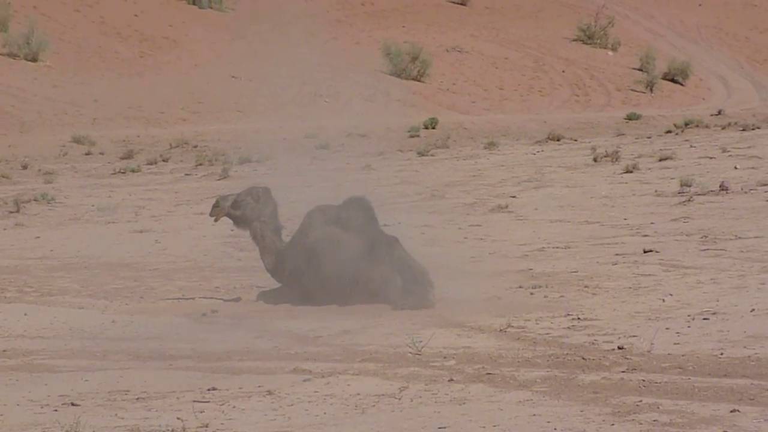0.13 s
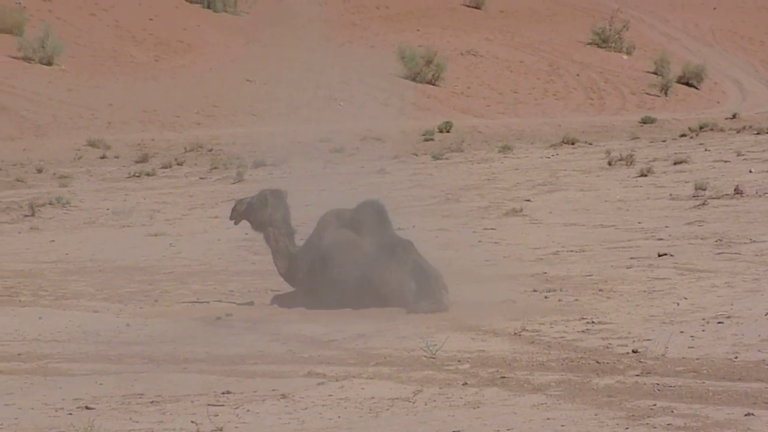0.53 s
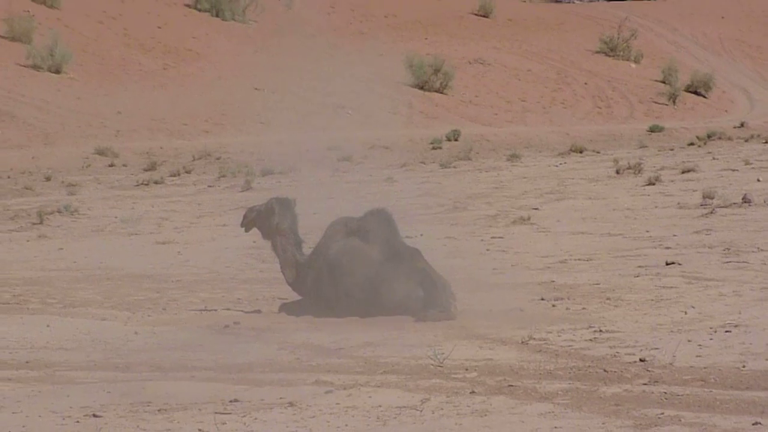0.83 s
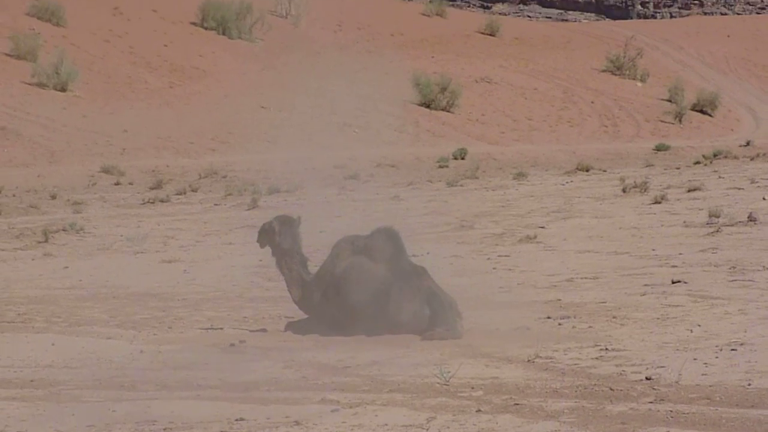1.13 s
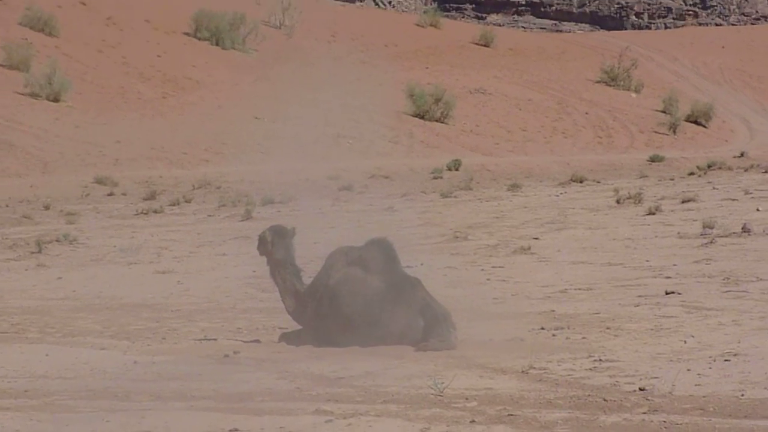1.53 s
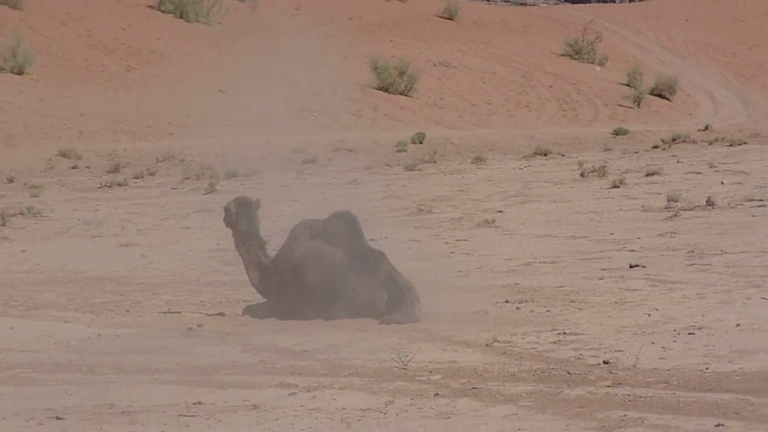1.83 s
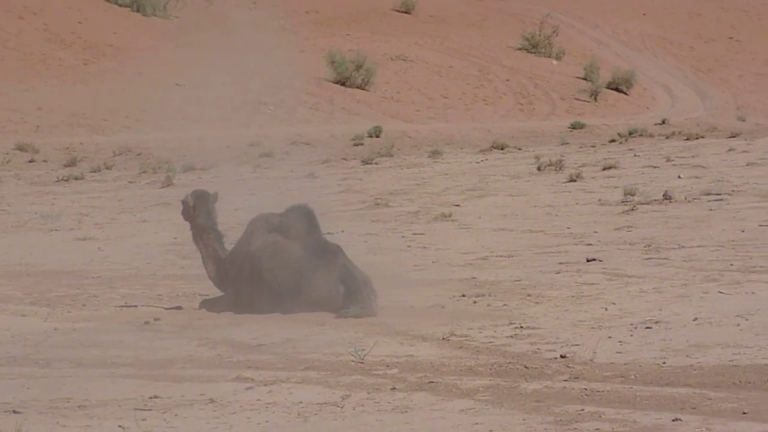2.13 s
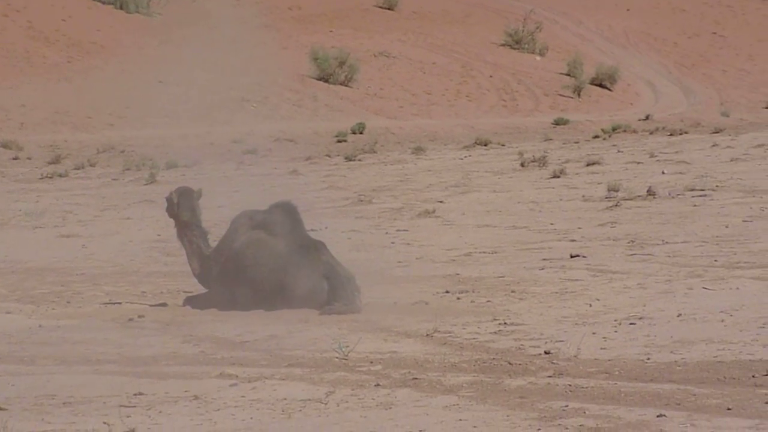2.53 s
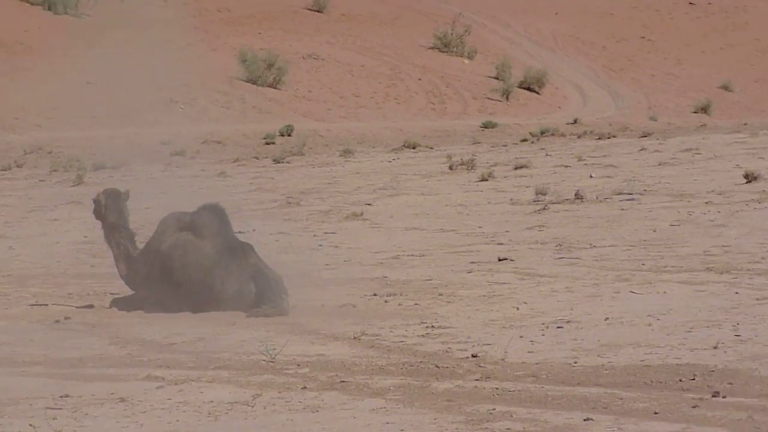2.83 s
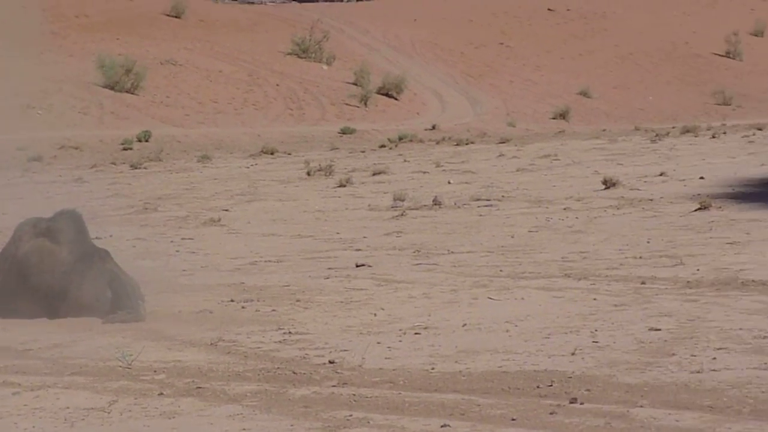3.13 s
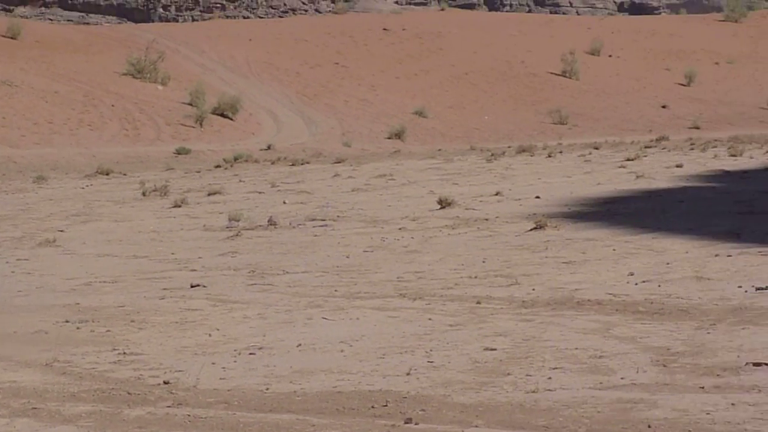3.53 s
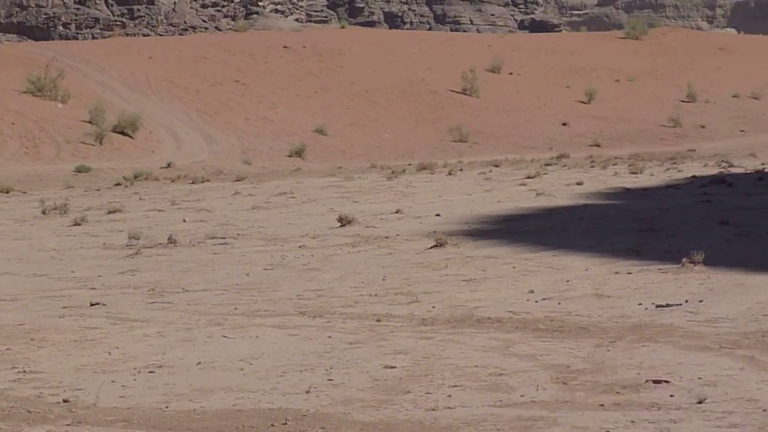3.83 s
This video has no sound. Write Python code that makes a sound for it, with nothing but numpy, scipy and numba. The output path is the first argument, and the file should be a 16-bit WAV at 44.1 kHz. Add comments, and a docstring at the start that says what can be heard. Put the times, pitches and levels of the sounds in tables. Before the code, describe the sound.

A camel whines thinly, grunts, gurgles, then gives a long low groan breaking into a roar.

```python
"""A camel in the open whines, grunts, gurgles, then gives a long groan that breaks into a roar.
Vocal-fold pulses, clean or ragged, and their puffs of air ring resonances of throat and mouth.
A thin sinking whine, summed from sines, starts before the grunt and lasts into the gurgle.
Shaped noise gives breath hiss in the mouth, gusts of wind, a faint air noise and two small clicks."""
import sys
import numpy as np
from scipy import signal
from scipy.fft import rfft, irfft
from scipy.io import wavfile
from scipy.ndimage import uniform_filter1d, map_coordinates
from numba import njit

SR = 44100
rng = np.random.default_rng(int(sys.argv[2]) if len(sys.argv) > 2 else 0)


def persist_wave(psi):
    """Save psi, clipped to +-1, as 16-bit WAV."""
    counts = np.round(np.clip(psi, -1, 1) * 32767).astype(np.int16)
    wavfile.write(sys.argv[1], SR, np.atleast_2d(counts).T)


N = 176400

# vocal folds of each call: t/s, f/Hz, roughness/0-1
GRUNT_FOLDS = [(.5, 122, .25), (.56, 133.5, .08), (.585, 133, .03), (.62, 129, .03), (.67, 131.8, .02),
               (.715, 131.5, .04), (.74, 130, .7), (.9, 128, .8), (1.06, 118, .7)]
GURGLE_FOLDS = [(1.24, 245, .6), (1.43, 230, .6), (1.455, 216, .15), (1.52, 230, .12), (1.58, 222, .6)]
GROAN_FOLDS = [(2.0, 76, .15), (2.15, 86.4, .02), (2.2, 89.8, .02), (2.25, 93.2, .02), (2.3, 94.4, .02),
               (2.39, 93.3, .02), (2.46, 97.7, .08), (2.6, 97, .12), (2.68, 104, .2), (2.73, 92, .06),
               (2.79, 86.8, .03), (2.88, 85.8, .03), (2.95, 79.8, .04), (3.02, 88.3, .02), (3.15, 90, .02),
               (3.3, 92.1, .01), (3.4, 92.4, .01), (3.5, 94, .01), (3.6, 93.9, .01), (3.68, 95.7, .06),
               (3.72, 93.8, .02), (3.76, 95, .04), (3.82, 100, .25)]
ROAR_FOLDS = [(3.76, 154.4, .4), (3.83, 151.4, 0.86), (3.92, 154.2, .8), (4.0, 143.8, 0.58)]
RATTLE_FOLDS = [(1.05, 118.7, 0.51), (1.25, 114.3, 0.93)]
# grunt registers before trim: t/s, bass level/dB, lower middle level/dB, upper middle level/dB, treble level/dB
GRUNT_LEVELS = [(0.5, -61, -50, -56, -70.5), (0.508, -44.5, -52, -61, -81), (0.53, -46, -39, -38.5, -68),
                (0.698, -36, -45.5, -33.5, -58), (0.746, -36, -36.5, -42, -50.5),
                (0.896, -35, -38, -49.5, -47.5), (0.93, -35.5, -40, -49, -57),
                (0.962, -41.5, -43, -54, -64), (0.988, -33, -46.5, -48.5, -57), (1.052, -54, -50, -71, -79),
                (1.06, -50, -55, -65, -70)]
# registers of the other calls, before trim: t/s, bass level/dB, middle level/dB, treble level/dB
GURGLE_LEVELS = [(1.24, -49, -58, -79), (1.27, -36.5, -77, -91), (1.278, -37, -47, -57.5),
                 (1.376, -34, -51, -92), (1.384, -31, -48, -76.5), (1.396, -40, -47, -60),
                 (1.436, -31, -53, -76), (1.456, -45.5, -48, -69), (1.54, -44, -42, -58),
                 (1.606, -36.5, -59.5, -85), (1.638, -54, -62, -77), (1.67, -58, -71, -93)]
GROAN_LEVELS = [(2.0, -58.5, -72, -95), (2.15, -53, -53.5, -46), (2.244, -64, -53, -42.5),
                (2.304, -47.5, -46, -43), (2.576, -35, -46, -44), (2.61, -43.5, -44, -41),
                (2.64, -30, -48, -47), (2.782, -50.5, -49, -46), (2.966, -56, -51.5, -57),
                (3.022, -52.5, -53.5, -51), (3.188, -42.5, -44, -42), (3.504, -36.5, -46.5, -41.5),
                (3.574, -40, -43.5, -40), (3.768, -39, -39.5, -39.5), (3.8, -35, -41, -37.5)]
ROAR_LEVELS = [(3.775, -37, -65.5, -55), (3.805, -34.5, -39, -37), (3.83, -25.5, -32.5, -35.5),
               (3.89, -25.5, -32, -37), (3.93, -25.5, -33, -37.5), (3.975, -21.5, -38, -37),
               (4.0, -22.5, -31, -38.5)]
RATTLE_LEVELS = [(1.06, -42, -52, -75), (1.15, -44.5, -64, -71), (1.25, -62, -59, -84)]
# throat and mouth resonances before mouth shift: centre f/Hz, inner width/Hz, relative level/dB
GRUNT_THROAT = [(134.26, 20, -16.5), (252.6, 36, 6), (384, 35.6, -3), (521, 57, -12.5), (711, 150, 0.5),
                (1092, 85, 3), (1318, 110, -1.5), (1553, 110, -15), (1837, 84, -19.5), (2387, 190, -17),
                (4010, 450, -33.5)]
GURGLE_THROAT = [(245, 42, 1.5), (320, 85, -17), (655, 146, -8), (912, 52, -14.5), (1090, 150, -11),
                 (1430, 170, -17), (1688, 164, -13), (2430, 240, -25.5), (3150, 340, -30)]
GROAN_THROAT = [(181.3, 53, -7.5), (289, 44.5, 9.5), (364, 115, -14), (519, 97, -11), (743, 67, -4),
                (860, 65, -14), (1090, 82, -19), (1557, 177, -9), (1789, 250, -8), (1981, 141, -1),
                (2245, 92, -8.5), (2860, 980, -23.5), (4100, 1300, -28)]
ROAR_THROAT = [(293.6, 53.5, 16.5), (350, 26, -15), (780, 80, -1.5), (1074, 50, -2), (1297, 144, -10),
               (1626, 255, -10.5), (1936, 190, -14), (2080, 220, -18.5), (2690, 920, -34.5),
               (4170, 270, -72.5)]
# mouth opening in the groan raises its upper resonances, which ease back later: t/s, frequency factor
GROAN_MOUTH = [(2.2, 0.84), (2.33, 0.89), (2.6, 0.95), (2.76, 0.97), (2.95, 1.03), (3.3, 0.96)]
# groan folds slap twice a cycle; 0 alike (near an octave up), 1 a quarter turn apart: t/s, unlikeness/0-1
GROAN_SPLIT = [(2.23, .08), (2.3, .45), (2.65, .65), (2.77, .15), (3.02, .15), (3.3, .8), (3.62, .6),
               (3.72, .25)]
# slack tissue chops the rough calls into bursts: start t/s, length/s
BURSTS = [(.734, .018), (.763, .016), (.787, .014), (.809, .019), (.846, .019), (.876, .009), (.928, .009),
          (1.276, .016), (1.392, .011)]
# thin whine before flutter: t/s, f/Hz, first harmonic level/dB, second harmonic level/dB
WHINE = [(.34, 412.7, -53, -71), (.356, 391, -59.5, -50.5), (.378, 378.7, -51, -55),
         (.397, 365, -49.5, -44), (.428, 348, -58.5, -53.5), (.455, 349.3, -57.5, -37),
         (.49, 338.3, -41, -35.5), (.52, 335, -64, -45), (.7, 350, -54, -52), (.85, 357.5, -43.5, -47),
         (1.0, 345.8, -43, -45.5), (1.07, 340, -49.5, -47), (1.15, 339.2, -38.5, -52),
         (1.21, 325.7, -49.5, -51.5), (1.27, 321.7, -40.5, -60), (1.34, 306.3, -45.5, -46),
         (1.4, 296, -61.5, -69)]
# air hissing through the mouth: t/s, level/dB
MOUTH_HISS = [(2.7, -90), (2.85, -66.5), (3.2, -67), (3.6, -79)]
# clicks: t/s, peak level/dB, centre f/Hz, width/Hz
CLICKS = [(.056, -47.5, 1200, 1800), (3.096, -32.5, 3450, 3520)]
# wind rumble before the channel offset: t/s, level/dB
WIND = [(0.0, -64), (0.97, -67), (1.09, -61), (1.41, -39.5), (1.48, -49.5), (1.53, -43), (1.59, -67),
        (1.66, -47), (1.73, -58.5), (1.87, -45.5), (1.96, -62), (1.99, -43.5), (2.32, -53), (2.38, -79),
        (2.51, -54.5), (2.58, -78.5), (3.16, -69), (3.23, -45.5), (3.25, -64), (3.53, -49), (3.56, -61),
        (3.97, -67), (4.0, -49)]
# wind spectrum: f/Hz, relative level/dB
WIND_COLOUR = [(20, -22.5), (45, -3.5), (80, -1), (125, -4.5), (180, -15.5), (300, -23), (800, -61),
               (3000, -99)]
# air noise spectrum: f/Hz, relative level/dB
AIR = [(88, -16), (150, -8), (195, -7.5), (329, -10.5), (407, -9), (487, -12), (796, -12), (923, -15),
       (1480, -21), (1990, -23), (7500, -32), (9750, -71.5), (16500, -120)]

SKIRT_WIDTHS = 2.5  # outer skirt, in resonance widths
PUFF_DECAY_CYCLES, PUFF_LOW_HZ = 1, 475
BURST_DB = 10  # treble boost before levelling
LEVELLING_SAMPLES = 1500
SECOND_SLAP_GAIN = 0.86
WHINE_THIRD_DB = -17.5  # re second harmonic
WHINE_WAVER, WHINE_FLUTTER_DB = 0.0043, 1.3  # waver: rms fraction of pitch
MOUTH_HISS_HZ, MOUTH_HISS_WIDTH_HZ = 4400, 1500
NEAR_SIDE_DB, NEAR_SIDE_HZ = 2.5, 750  # voice louder on the right above this
PORT_LAG_S = .00004  # left lags right
GROUND_DB, GROUND_DECAY_S, GROUND_TOP_HZ = -14, .014, 4500
CLICK_DECAY_S = 0.00064
WIND_LEFT_DB, WIND_RIGHT_DB = -1, 5.5
AIR_DB, AIR_SIDE_DB, AIR_SPLIT_HZ = -59.5, 2.5, 1200
TOP_HZ, NOTCH_HZ, NOTCH_Q, END_FADE_S = 7750, 5480, 22, .003


def camel():
    """Sum of the calls: whine to gurgle overlap, then a pause, then groan into roar."""
    return whine() + mouth_hiss() + grunt() + rattle() + gurgle() + groan() + roar()


def roar():
    """Rough, dense folds near 150 Hz with strong puffs."""
    voice = call(ROAR_FOLDS, ROAR_LEVELS, ROAR_THROAT, edges_hz=(480, 1400),
                 rasp=1.0, hiss=0.31, jitter=.08, shimmer_db=5.0)
    return undb(-0.15) * voice


def groan():
    """Folds slapping twice a cycle through a moving mouth."""
    voice = call(GROAN_FOLDS, GROAN_LEVELS, GROAN_THROAT, edges_hz=(480, 1200),
                 rasp=1.0, hiss=.085, jitter=0.14, shimmer_db=18.5,
                 flap=SECOND_SLAP_GAIN, mouth=curves(GROAN_MOUTH)[0], waver=.002, buzz_hz=2560)
    return undb(0.08) * voice


def grunt():
    """Folds that start fairly clean and turn ragged, in four registers."""
    voice = call(GRUNT_FOLDS, GRUNT_LEVELS, GRUNT_THROAT, edges_hz=(480, 900, 1750),
                 rasp=0.71, hiss=0.12, jitter=0.1695, shimmer_db=4.5)
    return undb(-.5) * voice


def gurgle():
    """Folds above 200 Hz, ragged at both ends and cleaner between."""
    voice = call(GURGLE_FOLDS, GURGLE_LEVELS, GURGLE_THROAT, edges_hz=(480, 1750), rasp=0.62, hiss=0.19)
    return undb(-1.5) * voice


def rattle():
    """Between grunt and gurgle the slack throat keeps fluttering softly."""
    return call(RATTLE_FOLDS, RATTLE_LEVELS, GURGLE_THROAT, edges_hz=(480, 900), rasp=0.92, hiss=0.14)


def call(folds, levels, throat, edges_hz, rasp, hiss, jitter=0.19, shimmer_db=5,
         flap=0, mouth=1, waver=.002, buzz_hz=6000):
    """Fold pulses and air puffs ring the throat; each register follows its own level."""
    hz, rough = curves(folds)
    rough = np.clip(rough, 0, 1)
    phase = np.cumsum(hz * (1 + waver * walk(30))) / SR  # cycles
    slaps = pulses(phase, rough, 0, jitter, shimmer_db)
    if flap:
        turn = np.exp(-.5j * np.pi * curves(GROAN_SPLIT)[0] * (1 + 0.2 * walk(14)))
        second = pulses(phase, rough, .5, jitter, shimmer_db)
        slaps = slaps + flap * (turn * signal.hilbert(second)).real
    source = breathy_buzz(slaps, np.mean(hz), hiss + rasp * rough, buzz_hz)
    voice = ring_throat(source, throat, mouth, edges_hz[-1])
    return set_registers(voice, levels, edges_hz)


def pulses(phase, rough, offset, jitter, shimmer_db, count=1100, size=8):
    """One band-limited slap per cycle; roughness scatters its time (cycles) and strength (dB)."""
    chance = rng.standard_normal((count, 2))[:int(phase[-1]) + 1]
    cycle = np.arange(len(chance)) + offset
    r = np.interp(cycle, phase, rough)
    scattered = cycle + jitter * r * np.clip(chance[:, 0], -2, 2)
    at = np.interp(scattered, phase, np.arange(N))
    strength = undb(shimmer_db * r * np.clip(chance[:, 1], -2, 1))
    strength = strength * (at < N - size)
    # windowed sinc places each slap between samples
    taps = at.astype(int)[:, None] + np.arange(1 - size, size + 1)
    away = taps - at[:, None]
    shapes = strength[:, None] * np.sinc(away) * np.sinc(away / size)
    return np.bincount(np.clip(taps, 0, N - 1).ravel(), shapes.ravel(), N)


def breathy_buzz(slaps, mean_hz, breath, buzz_hz):
    """Each slap releases a decaying puff of noise, added to the dulled slaps."""
    decay = np.exp(-mean_hz / SR / PUFF_DECAY_CYCLES)
    puffs = signal.lfilter([1], [1, -decay], np.abs(slaps)) * rng.standard_normal(N)
    puffs = unit(puffs - lowpass(puffs, PUFF_LOW_HZ, order=2))
    return lowpass(unit(slaps), min(buzz_hz, SR / 3), order=2) + breath * puffs


def ring_throat(source, throat, mouth, mouth_hz):
    """Parallel resonances of alternating sign; those above mouth_hz move with the mouth."""
    out = 0
    for k, (f, width, db) in enumerate(throat):
        centre = f * mouth if f > mouth_hz else f
        peak = ring(ring(source, centre, width), centre, width * SKIRT_WIDTHS)
        out = out + (-1) ** k * undb(db) * peak
    return out


def set_registers(rest, levels, edges_hz):
    """Split at the edges, add bursts growing towards the treble, level each band to its curve."""
    burst_gates = [gate([(start,), (start + length,)], fade_s=0.0017) for start, length in BURSTS]
    bursts = undb(BURST_DB * sum(burst_gates))
    out = 0
    for k, db in enumerate(curves(levels)):
        band = lowpass(rest, edges_hz[k]) if k < len(edges_hz) else rest
        rest = rest - band
        band = band * bursts ** (k / len(edges_hz))
        power = uniform_filter1d(band ** 2, size=LEVELLING_SAMPLES)
        power = uniform_filter1d(power, size=LEVELLING_SAMPLES)
        out = out + band / np.sqrt(np.abs(power) + 1e-14) * undb(db)
    return out * gate(levels)


def whine():
    """A second, nearly pure vibration of three harmonics that sinks in pitch."""
    hz, first_db, second_db = curves(WHINE)
    phase = 2 * np.pi * np.cumsum(hz * (1 + WHINE_WAVER * walk(90.3))) / SR
    upper = np.sin(2 * phase) + undb(WHINE_THIRD_DB) * np.sin(3 * phase)
    tone = undb(first_db) * np.sin(phase) + undb(second_db) * upper
    return np.sqrt(2) * tone * undb(WHINE_FLUTTER_DB * walk(70)) * gate(WHINE)


def mouth_hiss():
    """Turbulent air in the mouth: noise through two equal resonances."""
    hiss = ring(rng.standard_normal(N), MOUTH_HISS_HZ, MOUTH_HISS_WIDTH_HZ)
    hiss = unit(ring(hiss, MOUTH_HISS_HZ, MOUTH_HISS_WIDTH_HZ))
    return hiss * undb(curves(MOUTH_HISS)[0]) * gate(MOUTH_HISS)


def clicks():
    """Short dry ticks: decaying noise through one resonance, equal in both channels."""
    t, out = np.arange(N) / SR, 0
    for start, db, hz, width in CLICKS:
        decay = (t >= start) * np.exp(-np.abs(t - start) / CLICK_DECAY_S)
        tick = ring(rng.standard_normal(N) * decay, hz, width)
        out = out + undb(db) * tick / np.abs(tick).max()
    return out


def wind():
    """Gusts rumble as separate noise on each microphone port, louder on the right."""
    db, = curves(WIND)
    flutter = undb(2.54 * walk(22.07))
    ports = []
    for side_db in (WIND_LEFT_DB, WIND_RIGHT_DB):
        rumble = unit(colour(rng.standard_normal(N), WIND_COLOUR) * flutter)
        ports.append(rumble * undb(db + side_db))
    return np.array(ports)


def air():
    """Faint open-air noise: mid plus side, the side weakened in the bass so the treble is wide."""
    mid, side = (unit(colour(rng.standard_normal(N), AIR)) for _ in range(2))
    side = side - 0.84 * lowpass(side, AIR_SPLIT_HZ, order=1)
    stereo = mid + undb(AIR_SIDE_DB) * side * np.array([[1], [-1]])
    return undb(AIR_DB + .7 * walk(6)) * stereo


def undb(db):
    """Decibels to gain."""
    return 10 ** (np.asarray(db) / 20)


def unit(x):
    """Scale to rms 1."""
    return x / np.sqrt(np.mean(x ** 2) + 1e-20)


def curves(table):
    """Each column of a time table, sample by sample."""
    rows = np.array(table, float)
    return [np.interp(np.arange(N) / SR, rows[:, 0], col) for col in rows.T[1:]]


def gate(table, fade_s=0.013):
    """Fade in around a table's first time, fade out after its last."""
    t = np.arange(N) / SR
    opening = np.clip((t - table[0][0]) / fade_s + .5, 0, 1)
    return opening * np.clip((table[-1][0] - t) / fade_s + 1, 0, 1)


def colour(x, points):
    """Shape a spectrum by (f/Hz, level/dB) points, log-interpolated in frequency."""
    hz, db = np.array(points, float).T
    f = np.maximum(np.arange(N // 2 + 1) * SR / N, 1)
    return irfft(rfft(x) * undb(np.interp(np.log(f), np.log(hz), db)), N)


def ring(x, hz, width):
    """One resonance, fixed or moving, gain 1 at its centre."""
    hz = np.minimum(hz, SR / 3)
    if np.ndim(hz):
        return resonate(x, hz, float(width))
    return signal.lfilter(*signal.iirpeak(hz, hz / width, fs=SR), x)


@njit
def resonate(x, hz, width):
    """State-variable band-pass whose centre may move."""
    y, band, low = np.empty(len(x)), 0., 0.
    for i in range(len(x)):
        g, k = np.tan(np.pi * hz[i] / SR), width / hz[i]
        v = (band + g * (x[i] + 1e-18 - low)) / (1 + g * (g + k))
        band, low, y[i] = 2 * v - band, low + 2 * g * v, k * v
    return y


def lowpass(x, hz, order=4):
    """Low-pass without delay."""
    return signal.sosfiltfilt(signal.butter(order, hz, fs=SR, output="sos"), x)


def walk(rate_hz):
    """Slow smoothed chance with a spread near 1."""
    k = int(SR / rate_hz)
    steps = np.repeat(rng.standard_normal(N // k + 1), k)
    return unit(uniform_filter1d(uniform_filter1d(steps, k), k)[:N])


def scene():
    """Camel a little to the right, short scatter off the ground, wind, open air, clicks."""
    t, voice, ears = np.arange(N) / SR, camel(), []
    bass = lowpass(voice, NEAR_SIDE_HZ, order=2)
    upper = voice - bass
    for sign in (1, -1):  # left, right
        direct = bass + undb(-sign * NEAR_SIDE_DB / 2) * upper
        direct = map_coordinates(direct, [(t - sign * PORT_LAG_S / 2) * SR], mode="nearest")
        scatter = lowpass(rng.standard_normal(N), GROUND_TOP_HZ) * np.exp(-t / GROUND_DECAY_S)
        scatter = scatter / np.abs(rfft(scatter)[:N // 20]).mean()
        ears.append(direct + undb(GROUND_DB) * signal.fftconvolve(upper, scatter)[:N])
    return np.array(ears) + wind() + air() + clicks()


def record(dry):
    """Narrow treble notch, short fade at the end, steep cut of the top."""
    notched = signal.lfilter(*signal.iirnotch(NOTCH_HZ, NOTCH_Q, fs=SR), dry)
    faded = notched * np.minimum(np.arange(N)[::-1] / (END_FADE_S * SR), 1)
    return signal.sosfilt(signal.ellip(8, .3, 60, TOP_HZ, fs=SR, output="sos"), faded)


dry = scene()
out = record(dry)
persist_wave(out)
```